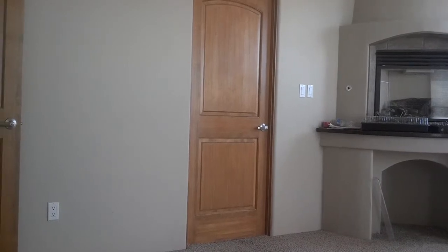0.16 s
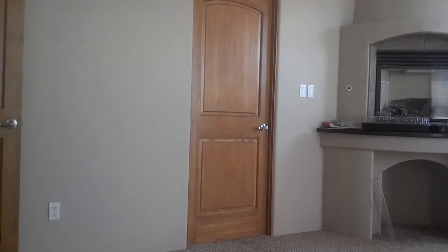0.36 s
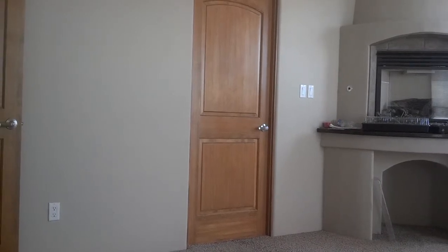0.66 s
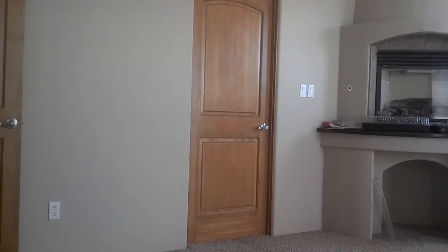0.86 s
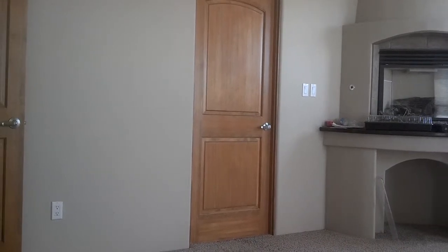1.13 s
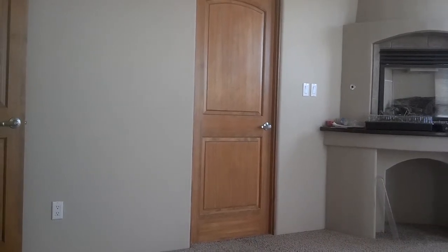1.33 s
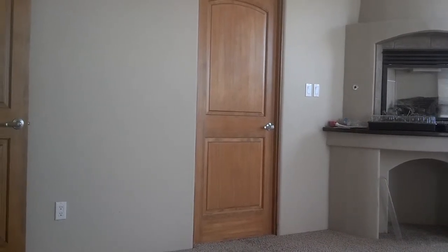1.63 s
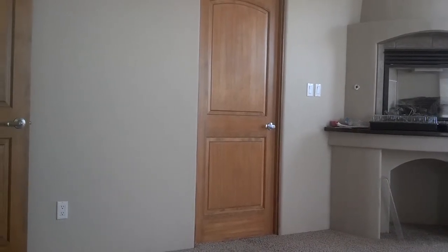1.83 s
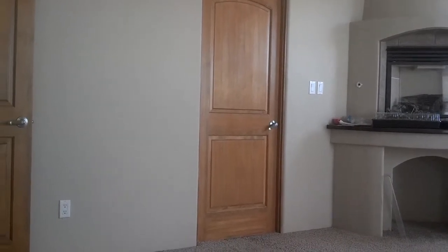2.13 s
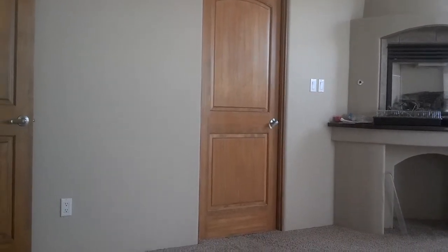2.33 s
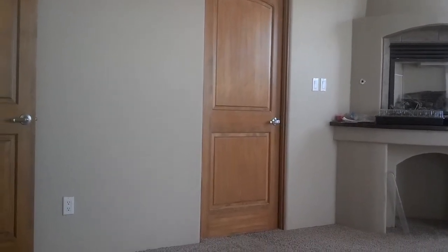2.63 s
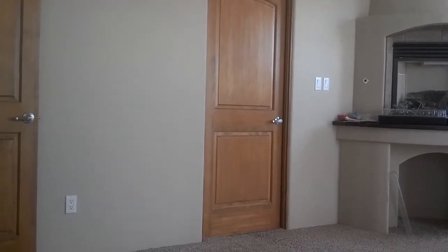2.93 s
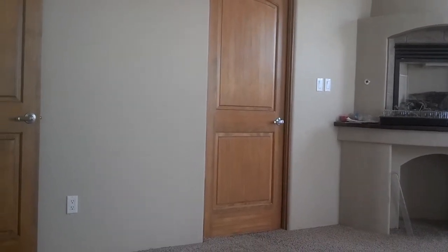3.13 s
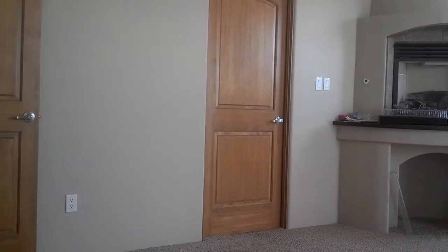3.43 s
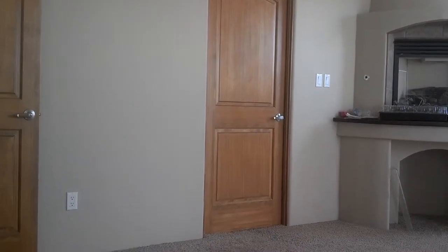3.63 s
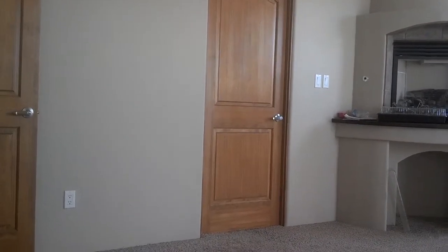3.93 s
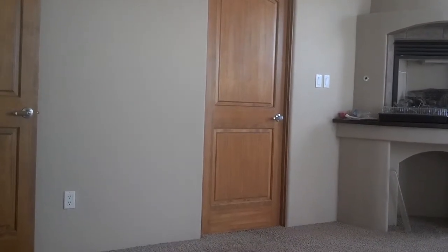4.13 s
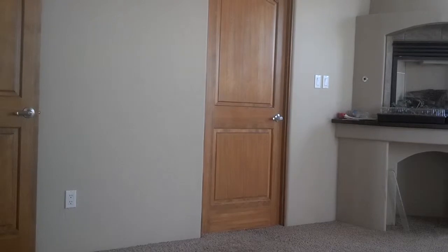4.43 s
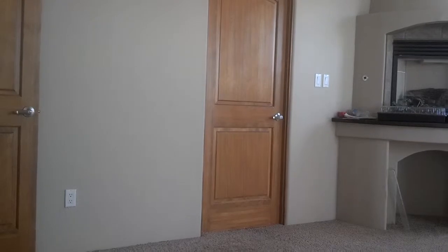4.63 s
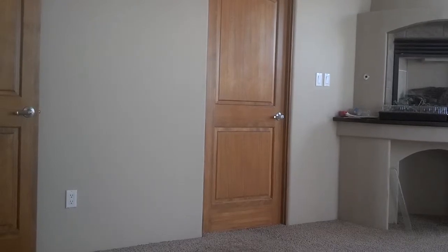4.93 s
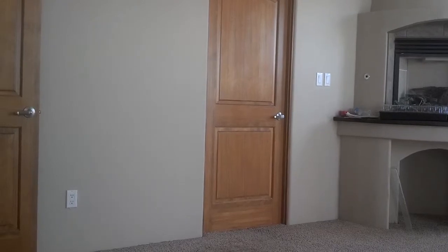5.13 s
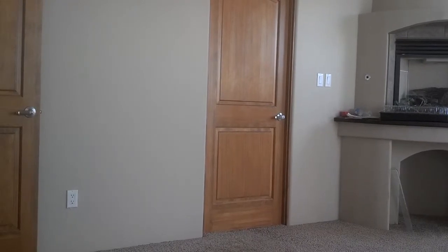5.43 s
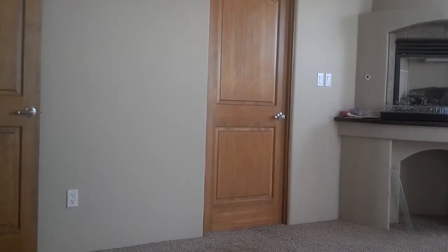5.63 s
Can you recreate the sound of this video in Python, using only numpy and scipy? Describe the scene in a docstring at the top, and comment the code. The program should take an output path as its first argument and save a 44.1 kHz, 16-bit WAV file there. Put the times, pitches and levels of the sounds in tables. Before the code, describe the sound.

A loose wooden door rattles in its frame, heard on a single microphone in a small furnished room. One soft knock, then two rapid bursts of hollow panel knocks and slab thumps with latch clicks and slight handle jingle. Tiny taps and a quiet swelling rub lead to one strong, boomy bang. Hissy room tone slowly returns, and a faint low knock comes near the end.

```python
"""A faint knock comes first; then a wooden door is shaken against its latch in two flurries.
It shifts softly, eases along its frame and bangs home; one last faint knock follows.
Each contact is noise filtered into a panel knock, a slab thump and a latch click with a jingle.
Slides are rubbing noise; the bang adds low sine tones, and a carpeted bedroom echoes the contacts.
A gain control ducks the room hiss after loud bursts; one microphone is widened to stereo."""
import sys
import numpy as np
from scipy import signal
from scipy.fft import irfft
from scipy.io import wavfile
from scipy.ndimage import uniform_filter1d

SR = 44100
rng = np.random.default_rng(int(sys.argv[2]) if len(sys.argv) > 2 else 0)


def store_pcm(level_fs):
    """Save levels as 16-bit WAV."""
    pcm = np.round(np.clip(level_fs, -1, 1) * 32767).astype(np.int16)
    wavfile.write(sys.argv[1], SR, np.atleast_2d(pcm).T)


N = 254898  # length in samples

# Door contacts, levels before the gain control: [start_s, knock_db, hardness_db_per_octave,
# squareness_0_to_1, thump_db, click_db]
DOOR_CONTACTS = [(0.527, -54.5, 0, 0.96, -48.5, -66), (1.681, -35.5, -4.5, 0.12, -32, -64),
                 (1.701, -27.5, -2, 0.29, -22.5, -39.5), (1.719, -34.5, 4, .3, -32, -44),
                 (1.749, -22.5, 3.5, 0.21, -47, -37), (1.776, -37, 5, 0.84, -37, -44),
                 (1.823, -29, 7, 0.37, -22, -47), (1.866, -20, 0, 0.13, -26, -42.5),
                 (1.891, -22, -1.5, 0.2, -15.5, -41), (1.912, -18.5, 0.5, 0.29, -14.5, -46),
                 (1.964, -21, -4, .2, -14, -45), (1.987, -25, -1.5, .2, -13.5, -52),
                 (2.016, -28.5, -1.5, 0.5, -34, -60), (2.046, -26.5, -1, 0, -22.5, -45),
                 (2.083, -34.5, -7, 0.29, -34, -58), (2.128, -28.5, 3, .1, -23.5, -48),
                 (2.177, -34, 3.5, 0.21, -34, -57), (2.25, -51, 0, 0.3, -37.5, -70),
                 (2.3687, -18.5, -2.5, 0.78, -24.5, -29), (2.399, -20, .5, 0.09, -17.5, -46),
                 (2.452, -16, -0.5, .3, -18.5, -39.5), (2.474, -25, 1.5, 0.52, -21, -39.5),
                 (2.519, -18, -3.5, .1, -17.5, -47), (2.549, -20.5, -1.3, 0.27, -17, -46),
                 (2.577, -30, 2, 0.33, -21.5, -45.5), (2.626, -29.5, -2, 0.06, -21.5, -66),
                 (2.82, -51, 8.5, .5, -65, -59), (2.917, -51.5, 5.5, 0.54, -58, -71),
                 (3.8067, -17.5, 1.5, 0.88, -34, -50), (3.825, -21.5, 2.5, 0.12, -32, -42),
                 (3.867, -29, 6, 0.51, -25, -62), (5.761, -55, 2, .3, -40, -70)]
# The door banging home: [start_s, thump_db, depth_db]
BANG = (3.824, -11.5, 5.8)
# Spells of the loose handle chattering: [start_s, length_s, jingle_db]
HANDLE_CHATTER = [(1.883, .06, -34.5), (1.947, .05, -32), (2.08, .025, -42), (2.528, .04, -39.5)]
# The door easing along its frame: [up_to_speed_s, stop_s, level_db]
DOOR_SLIDES = [(2.36, 2.37, -39), (3.51, 3.803, -45), (5.736, 5.78, -50)]

# Broad colour of a panel knock: [pitch_hz, level_db]
KNOCK_COLOUR = [(100, -44), (250, -19), (480, -1), (700, -3.5), (1000, -3), (1300, -0.5), (1900, 2),
                (2400, -5), (3000, -14), (4300, -11.5), (5200, -22), (6500, -24), (8200, -39.5),
                (16000, -36.5)]
# Resonances of the door's panels and stiles, at full strength: [pitch_hz, width_hz, lift_db]
PANEL_RESONANCES = [(103.9, 5.9, 8), (177, 42, 5), (269.5, 8, 5.5), (379.5, 6, 3.5), (508, 44, 4.5),
                    (888, 67, 4.5), (947, 18, 3.5), (1051, 38, 5.5), (1140, 15, 6), (1291, 63, 7),
                    (1347, 16, 0.5), (1600, 30, 3.5), (1654, 43, 0.5), (1830, 23, 6.5), (2118, 16, 7.5),
                    (3160, 91, 8.5), (3540, 89, 5.5), (4380, 21, 4.5)]
# Broad colour of a slab thump: [pitch_hz, level_db]
THUMP_COLOUR = [(25, -30), (55, -14), (76, -16.5), (108, -5), (170, -2), (300, -0.5), (480, -7.5),
                (700, -13), (1400, -28.5), (4000, -63)]
# How a deep thump differs from a shallow one: [pitch_hz, share_of_depth]
DEEP_THUMP_COLOUR = [(55, -0.68), (105, 1), (200, -0.7), (500, -1.1)]
# Lowest modes of slab and room, levels against each other: [pitch_hz, level_db, time_to_fall_60_db_s]
LOW_MODES = [(64.6, -11, 0.98), (81, -13, .9), (97, -6, .8), (110.2, 1, 0.68), (121.3, -5, 0.59),
             (145, -17, 0.58), (197.5, -9, 0.55), (241, -6, 0.57)]
# Broad colour of a latch click: [pitch_hz, level_db]
CLICK_COLOUR = [(1000, -11), (3000, -4), (6000, 13), (8200, -7.5), (10000, 0.5), (13000, 0), (16000, -20)]
# Broad colour of the latch jingle: [pitch_hz, level_db]
JINGLE_COLOUR = [(9000, -59), (13500, -48), (14500, 9), (15000, 6), (15800, -9)]
# Resonances of the latch parts, plus a broad lift near 9.6 kHz, before each click varies them: [pitch_hz,
# width_hz, lift_db]
LATCH_RESONANCES = [(9580, 1100, 8.5), (11620, 150, 12), (13000, 190, 11), (14600, 200, 4), (15500, 240, 3)]
# Broad colour of the rubbing door: [pitch_hz, level_db]
RUB_COLOUR = [(40, -47), (110, -15.5), (250, -4.5), (360, -1), (480, -7.5), (700, -19), (1250, -21.5),
              (2500, -28.5), (8000, -42)]
# How quickly the room's reflections die: [pitch_hz, time_to_fall_60_db_s]
ROOM_DECAY = [(60, 1), (120, 0.48), (240, 0.35), (400, 0.5), (1000, 0.4), (2000, 0.51), (4000, 0.45),
              (7500, 0.42), (11000, 0.29), (16000, 0.22)]
# Broad colour of the room air: [pitch_hz, level_db]
AIR_COLOUR = [(25.0, -5), (50.0, -22), (100.0, 0.5), (160.0, 0), (330.0, -3), (500.0, -6), (800.0, -12.0),
              (1600.0, -15.5), (3000.0, -19.0), (6000.0, -23.0), (9000.0, -28.5), (11500.0, -27),
              (14000.0, -18.5), (15500.0, -18.5)]

# One door edge lands first, the other after a gap: askew contact, square contact
EDGE_GAPS_S = [0.010, 0.003]
EDGE_CRACKS_DB = [1.5, 2]  # a square hit cracks more sharply
SECOND_EDGE_DB = [1.5, -4.5]  # the second edge against the first
# The door brushes the frame just before it lands; level is against the knock
BRUSH_LEAD_S, BRUSH_DB, BRUSH_HARDNESS_DB_PER_OCTAVE = 0.006, -19, -4.5
# Soft, weak knocks sound hollow
HOLLOW_DB, HOLLOW_PER_HARDNESS, HOLLOW_PER_DB, USUAL_KNOCK_DB = 2.5, -1.05, -0.24, -23
ORDINARY_DEPTH_DB = 0
BOOM_DB, BOOM_LAG_S = -17.5, 0.01175  # the lowest modes swell just after the bang
BOLT_JINGLE_DB = -4  # jingle shaken loose by the bolt, against its click
CHATTER_PER_S, CHATTER_JITTER_S = 67, 0.0013
CHATTER_SPREAD_DB, CHATTER_CLICK_DB = 1, -14  # click is against the jingle
SLIDE_RISE_DB_PER_S, SLIDE_STOP_DB_PER_S = 38, 600
AIR_DB = -47  # room tone before its wander and the gain control
CEILING = 0.5  # peak limit of the left side, against full scale
WIDEN_SAMPLES = 16  # delay of the right side
TOP_HZ = 15850  # upper band limit
FILTER_TAPS = 4096
HZ = np.fft.rfftfreq(FILTER_TAPS, 1 / SR)


def door():
    """Contacts crack the panels; coming from one door, they share part of their reflections."""
    out = np.zeros(N)
    common = reflections()
    wood = read(KNOCK_COLOUR, HZ) + lifts(PANEL_RESONANCES)
    treble_octaves = np.log2(np.clip(HZ, 1600, 6000) / 1600)
    hollow = lifts([(640, 1030, 1)])  # one broad peak: pitch_hz, width_hz, lift_db
    for s, knock_db, hardness, hollow_db, crack_db in knocks():
        tail = reflections() + 0.38 * common
        direct = 0.25 * gain_of(0.5 * crack_db)
        path = room_path(tail, direct, crack_db, crack_s=0.005)
        curve_db = wood + hardness * treble_octaves + hollow_db * hollow
        add(out, s, at_level(colour(path, curve_db), knock_db, over_s=0.03))
    return out


def knocks():
    """A light brush, then one edge after the other: start_s, db, hardness, hollow_db, crack_db."""
    for s, db, hardness, square, _, _ in DOOR_CONTACTS:
        gap_s = np.interp(square, [0, 1], EDGE_GAPS_S)
        crack_db = np.interp(square, [0, 1], EDGE_CRACKS_DB)
        second_db = np.interp(square, [0, 1], SECOND_EDGE_DB)
        hollow_db = HOLLOW_DB + HOLLOW_PER_HARDNESS * hardness
        hollow_db += HOLLOW_PER_DB * (db - USUAL_KNOCK_DB)
        brush_db = db + BRUSH_DB
        yield s - BRUSH_LEAD_S, brush_db, BRUSH_HARDNESS_DB_PER_OCTAVE, hollow_db, EDGE_CRACKS_DB[0]
        yield s, db, hardness, hollow_db, crack_db
        yield s + gap_s, db + second_db, hardness, hollow_db, crack_db


def slab():
    """The heavy slab swings against its stops; its bass swells a moment after each contact."""
    out = np.zeros(N)
    t = np.arange(SR) / SR
    body = read(THUMP_COLOUR, HZ) + lifts(PANEL_RESONANCES)
    deepening = read(DEEP_THUMP_COLOUR, HZ)
    for s, thump_db, depth in thumps():
        path = room_path(reflections(), direct=0.042, crack_db=-2.5, crack_s=0.018)
        swell = 1 - np.exp(-t / 0.017)
        thump = colour(path, body + depth * deepening) * swell
        add(out, s, at_level(thump, thump_db, over_s=0.038))
    # Only the full swing wakes the lowest modes
    add(out, BANG[0] + BOOM_LAG_S, at_level(boom(t), BOOM_DB, over_s=0.074))
    return out


def thumps():
    """Every contact stops the slab; the bang stops it deepest: start_s, thump_db, depth_db."""
    ordinary = [(s, thump_db, ORDINARY_DEPTH_DB) for s, _, _, _, thump_db, _ in DOOR_CONTACTS]
    return ordinary + [BANG]


def boom(t):
    """The lowest modes of slab and room ring as dying sine tones with a short swell."""
    tones = sum(gain_of(db - 60 * t / t60) * np.sin(2 * np.pi * hz * t) for hz, db, t60 in LOW_MODES)
    return tones * (1 - np.exp(-t / 0.0099))


def latch():
    """The bolt clicks on its strike plate and the handle's spring jingles."""
    out = np.zeros(N)
    spring = lifts(LATCH_RESONANCES)
    steel = read(CLICK_COLOUR, HZ)
    jingle = read(JINGLE_COLOUR, HZ) + spring
    for s, click_db, jingle_db in latch_hits():
        ringing = rng.uniform(0.5, 1.8)  # clicks ring more or less from hit to hit
        snap_db = np.clip(1.0 + 0.44 * (click_db + 37), 0, 14)  # harder hits snap more drily
        path = room_path(reflections(), direct=0.35, crack_db=snap_db, crack_s=0.006)
        add(out, s, at_level(colour(path, steel + ringing * spring), click_db, over_s=0.03))
        add(out, s, at_level(colour(path, jingle), jingle_db, over_s=0.015))
    return out


def latch_hits():
    """The bolt hits at each contact; the handle chatters unevenly: start_s, click_db, jingle_db."""
    for s, *_, click_db in DOOR_CONTACTS:
        yield s, click_db, click_db + BOLT_JINGLE_DB
    for start, length, db in HANDLE_CHATTER:
        for s in np.arange(start, start + length, 1 / CHATTER_PER_S):
            late, strong = rng.standard_normal(2)
            jingle_db = db + CHATTER_SPREAD_DB * strong
            yield s + CHATTER_JITTER_S * late, jingle_db + CHATTER_CLICK_DB, jingle_db


def easing():
    """Uneven friction rubs the door, coloured by its panels; each slide swells and stops short."""
    grip = evened(uniform_filter1d(rng.standard_normal(N), size=900))
    friction = rng.standard_normal(N) * gain_of(1.2 * grip)
    t = np.arange(N) / SR
    level = np.zeros(N)
    for full, stop, db in DOOR_SLIDES:
        rise_db = SLIDE_RISE_DB_PER_S * np.maximum(full - t, 0)
        stop_db = SLIDE_STOP_DB_PER_S * np.maximum(t - stop, 0)
        level += gain_of(db - rise_db - stop_db)
    rub_db = read(RUB_COLOUR, HZ) + 0.28 * lifts(PANEL_RESONANCES)
    return level * evened(colour(friction, rub_db))


def air():
    """Filtered noise makes room tone and microphone hiss, with a gently wandering low end."""
    wander = evened(uniform_filter1d(rng.standard_normal(N), size=7000))
    tone = evened(colour(rng.standard_normal(N), read(AIR_COLOUR, HZ)))
    low = signal.sosfilt(signal.butter(1, 700, fs=SR, output="sos"), tone)
    return gain_of(AIR_DB) * (tone + low * (gain_of(0.11 * wander) - 1))


def reflections():
    """Dense room reflections: one second of noise, each pitch band dying at its own pace."""
    hz, frame_s, bands = signal.stft(rng.standard_normal(SR), SR, nperseg=256)
    decay = gain_of(-60 * frame_s / read(ROOM_DECAY, hz)[:, None])
    return signal.istft(bands * decay, SR, nperseg=256)[1][:SR]


def room_path(tail, direct, crack_db, crack_s):
    """One contact reaching the microphone: a click, a brief crack, then the room."""
    path = tail * (1 + gain_of(crack_db) * np.exp(-np.arange(SR) / SR / crack_s))
    path[0] += direct * np.linalg.norm(path)
    return path


def lifts(modes):
    """The dB peaks that resonances put on a spectrum."""
    return sum(db / (1 + (2 * (HZ - hz) / width) ** 2) for hz, width, db in modes)


def colour(x, curve_db):
    """Filters to a dB curve so that peaks ring after a blow, never before."""
    mirrored_db = np.r_[curve_db, curve_db[-2:0:-1]]
    log_gain = np.log(gain_of(mirrored_db))
    response = np.exp(np.conj(signal.hilbert(log_gain)))[:len(HZ)]  # minimum phase
    return signal.oaconvolve(x, irfft(response))[:len(x)]


def gain_of(db):
    """Turns decibels into amplitude."""
    return 10 ** (np.asarray(db) / 20)


def evened(x):
    """Scales to an rms (average strength) of 1."""
    return x / np.sqrt(np.mean(x ** 2) + 1e-20)


def at_level(x, db, over_s):
    """Gives a blow the energy of a sound that holds db for over_s seconds."""
    return x * gain_of(db) * np.sqrt(over_s * SR / np.sum(x ** 2))


def read(points, hz):
    """Reads between table points along a logarithmic pitch axis."""
    f, value = np.transpose(points)
    return np.interp(np.log(hz + 1), np.log(f + 1), value)


def add(mix, s, sound):
    """Mixes a sound in at time s, in seconds."""
    part = mix[max(round(s * SR), 0):][:len(sound)]
    part += sound[:len(part)]


def scene():
    """Everything arrives at a single microphone, so both sides start out the same."""
    sound = door() + slab() + latch() + easing() + air()
    return np.array([sound, sound])


def gain_control(x, threshold_db, slope, recover_db_per_s, attack_s):
    """Turns down quickly on loud sound and comes back slowly."""
    r = np.exp(-1 / (attack_s * SR))
    power = signal.lfilter([1 - r], [1, -r], x ** 2)
    power_db = 10 * np.log10(power + 1e-12)
    wanted_cut_db = slope * np.maximum(power_db - threshold_db, 0)
    # The running maximum holds the deepest cut, less a steady recovery
    recovery_db = np.arange(N) / SR * recover_db_per_s
    cut_db = np.maximum.accumulate(wanted_cut_db + recovery_db) - recovery_db
    return x * gain_of(-signal.lfilter([1 - r], [1, -r], cut_db))


def record(dry):
    """Gain control and soft peak limit, then a late, inverted right side and a treble cutoff."""
    left = gain_control(dry.mean(0), threshold_db=-24.0, slope=0.69, recover_db_per_s=7.5, attack_s=0.0058)
    left = left / (1 + (left / CEILING) ** 4) ** (1 / 4)
    late = np.r_[np.zeros(WIDEN_SAMPLES), left[:-WIDEN_SAMPLES]]
    right = -gain_of(0.2) * late
    low_pass = signal.firwin(511, TOP_HZ, window=("kaiser", 9), fs=SR)
    return signal.oaconvolve(np.array([left, right]), low_pass[None], "same")


dry = scene()
out = record(dry)
store_pcm(out)
```